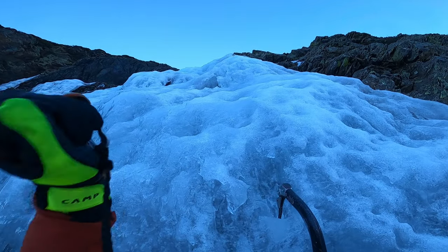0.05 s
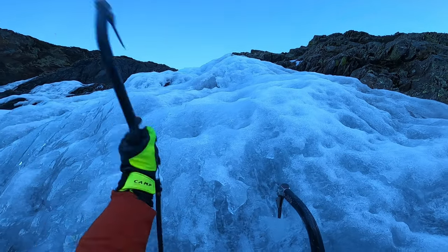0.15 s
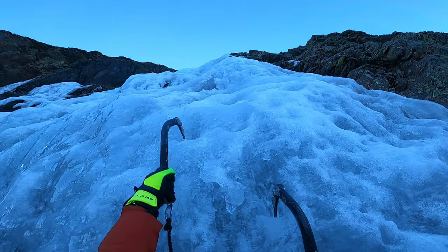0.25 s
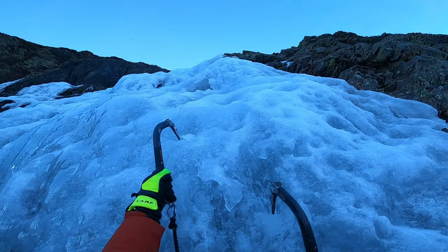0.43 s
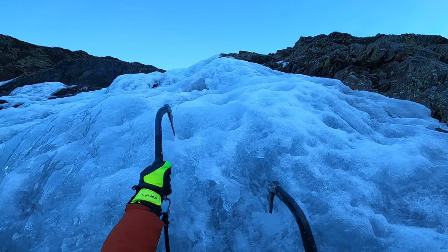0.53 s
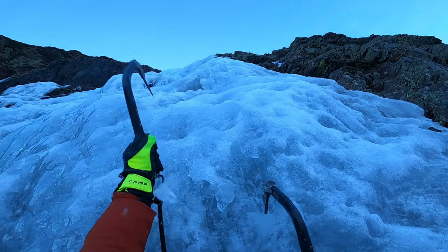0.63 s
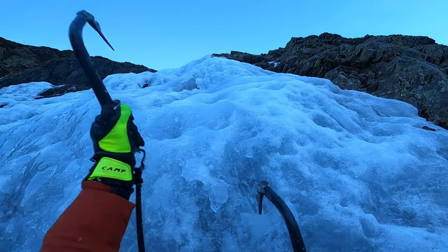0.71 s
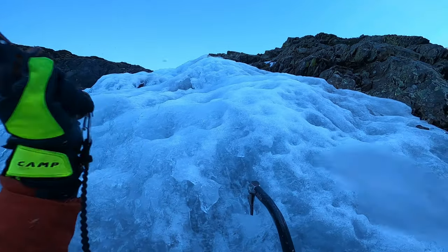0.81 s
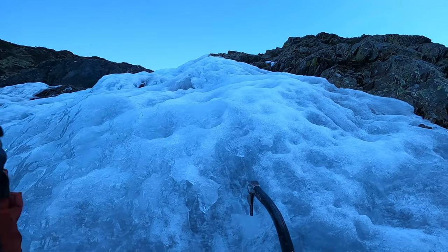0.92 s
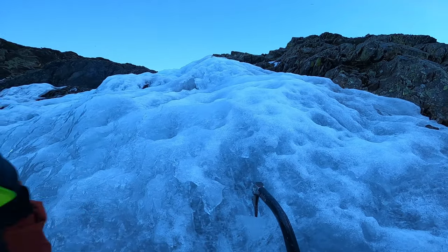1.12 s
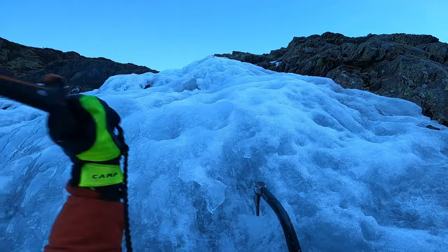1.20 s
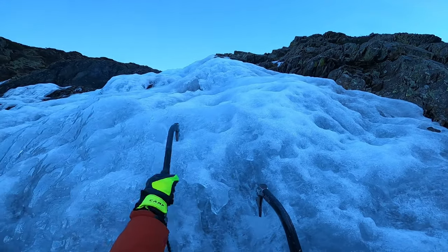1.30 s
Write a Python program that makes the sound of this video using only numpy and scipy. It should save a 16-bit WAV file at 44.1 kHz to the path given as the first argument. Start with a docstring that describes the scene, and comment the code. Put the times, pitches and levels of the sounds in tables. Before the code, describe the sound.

Close up on a mountainside, an ice axe strikes hard ice, knocks as it is levered, then pulls out with a crunch. One flying chip smacks the microphone and small fragments scatter, while a sleeve rustles and wind rumbles softly.

```python
"""An ice axe bites into a frozen slope, shifts with hollow knocks and is wrenched free with a crunch.
Breaking ice is made of bursts of grainy noise; knocks and clinks are tones that die away fast.
Splinters tick all around. One hits the camera by the right microphone and overloads it, so the
volume dips briefly. A sleeve rustles with the swing, wind rumbles on the microphones and the
mountain hisses far away."""
import sys
import numpy as np
from scipy import signal
from scipy.fft import rfft, irfft, next_fast_len
from scipy.io import wavfile
from scipy.ndimage import uniform_filter1d

SR = 44100
rng = np.random.default_rng(int(sys.argv[2]) if len(sys.argv) > 2 else 0)


def put_to_file(sound):
    """Save the sound as 16-bit audio at rate SR, in the file named by the first command-line argument."""
    columns = np.atleast_2d(sound).T  # one column per channel
    safe = np.clip(columns, -1, 1)
    whole_steps = np.round(safe * 32767)
    wavfile.write(sys.argv[1], SR, whole_steps.astype(np.int16))


N = 59535
TIME = np.arange(N) / SR

# The pick crushes the ice, then the edge of the hole crumbles.
# Each row: delay in seconds, level in dB, rise and fade in seconds. A fade is the time to drop 60 dB.
CRUSH_BURSTS = [(0, -13.3, .0025, .014), (.008, -27, .005, 0.056)]
# The tone of that crush. Each row: frequency in Hz, level in dB.
CRUSH_TONE = [(300, -7), (850, -5.5), (1120, 3.5), (1800, -8.5), (2600, 0.5), (3800, -4.5), (4600, -11),
              (8300, -9.5), (9800, -20), (15000, -37)]
# Axe and ice ring together. Each row: pitch in Hz, level in dB, then delay, rise and fade in seconds.
AXE_RING = [(560, -23, 0.004, 0.003, 0.02), (2650, -19, 0, .002, 0.012), (3780, -17, 0, 0.002, 0.009),
            (7734, -17, 0, 0.0027, 0.014)]

def axe_strike(start=.3427):
    """The pick crushes its way in with a knock that falls in pitch, and sets axe and ice ringing."""
    crush = sum(fracture(start + delay, db, rise, fade, CRUSH_TONE)
                for delay, db, rise, fade in CRUSH_BURSTS)
    bite = from_db(-7.5) * vibration(start, hz=990, rise=.004, fade=.011, bend=.6)
    ring = sum(from_db(db) * vibration(start + delay, hz, rise, fade)
               for hz, db, delay, rise, fade in AXE_RING)
    return crush + bite + ring

# The glassy ring that every break wakes in the ice. Each number is a pitch in Hz.
GLASSY_PITCHES = [1652, 2290, 3726, 4050, 5250, 8200]
ICE_WIDTH, ICE_GRAIN_DB = .29, 2.5  # stereo width; how much the tiny breaks differ in size

def fracture(start, db, rise, fade, tone, tilt_db=0):
    """Ice gives way in a short run of tiny breaks, which make the ice around them ring."""
    shape = envelope(start, rise, fade)
    burst = colour(shape * grains(ICE_WIDTH, ICE_GRAIN_DB), tone, tilt_db)
    ring = from_db(-3) * sum(resonance(burst, hz, fade=.057) for hz in GLASSY_PITCHES)
    return from_db(db) * unit_power(burst + ring) * np.sqrt(np.mean(shape ** 2))

# Ice cracks and splinters land. Each row: start in seconds, level in dB, rise and fade in seconds,
# tilt in dB per octave (higher is brighter).
ICE_CRACKS = [(0.283, -30.5, 0.0045, .034, -3.5), (0.373, -37.5, 0.006, 0.058, -1),
              (0.418, -40, .001, 0.029, -0.5), (.4728, -36, .0005, .012, -4.5),
              (.4968, -26.5, 0.0022, 0.042, -3), (0.5243, -31, 0.00066, 0.0052, 1.5),
              (0.5405, -39.5, 0.0075, 0.031, 0), (0.5865, -38.5, 0.00061, 0.011, 1.5),
              (0.705, -40, 0.00033, 0.018, -4), (0.798, -45, 0.0032, .016, 1), (.8135, -37, .0015, .005, 9),
              (.8145, -31.5, .002, .035, -7), (0.893, -23, 0.0027, 0.017, 1),
              (0.8975, -24, 0.00028, 0.007, .5), (0.9023, -23, 0.0036, 0.031, -2.5),
              (0.9459, -34, 0.0027, .02, 1.5), (1.1233, -26, 0.0005, 0.007, 4.8),
              (1.1752, -32.5, 0.0013, 0.02, -1.5), (1.2763, -33.5, 0.0021, 0.024, 1.3),
              (1.3119, -40, .001, 0.017, 0.5)]
# The tone of cracking ice. Each row: frequency in Hz, level in dB.
CRACK_TONE = [(200, -11), (700, -5), (1180, 2), (2700, -.5), (5400, -6), (6400, -10), (8300, -8),
              (10000, -26.5), (15000, -40)]

def cracks():
    """Ice crunches at the pick, and loose splinters tick as they land."""
    return sum(fracture(start, db, rise, fade, CRACK_TONE, tilt)
               for start, db, rise, fade, tilt in ICE_CRACKS)

# Hollow knocks. Each row: start in seconds, level in dB, pitch in Hz, fade in seconds.
PLATE_KNOCKS = [(.379, -37, 215, .07), (0.4724, -32.5, 404, 0.022), (.4968, -18.5, 563, 0.029),
                (0.8141, -27.5, 410, .025), (.8935, -25, 1210, .018), (.9047, -25, 970, .022)]
# The tones in one knock. Each row: pitch multiplier, added level in dB, fade multiplier.
PLATE_TONES = [(.38, -10.5, 0.95), (.72, -7, 0.42), (1, 1, 0.61), (1.1, -1, 1.2)]

def knocks(rise=.0027):
    """The levered pick knocks a plate of ice; neighbouring tones swing in opposite directions."""
    return sum((-1) ** k * from_db(db + added_db) * vibration(start, hz * ratio, rise, fade * stretch)
               for start, db, hz, fade in PLATE_KNOCKS
               for k, (ratio, added_db, stretch) in enumerate(PLATE_TONES))

# Deep thuds. Each row: start in seconds, level in dB, fade in seconds.
SHEET_THUDS = [(.3455, -22, .09), (.8163, -37, .05), (.9055, -25, .03)]

def thuds():
    """The ice sheet flexes under the pick; its lowest tones arrive last, so the pitch drops."""
    return sum(from_db(db) * vibration(start, hz=38, rise=.003, fade=fade, bend=7)
               for start, db, fade in SHEET_THUDS)

# Small clinks. Each row: start in seconds, lower pitch in Hz, levels of the lower and the upper tone
# in dB, fade in seconds.
PICK_CLINKS = [(.746, 4480, -50, -58, .07), (.815, 4900, -50, -62, .1), (.8955, 5390, -25, -32, .019),
               (1.0735, 5100, -44, -41, .022)]

def clinks(upper_ratio=1.5, rise=.002):
    """Pick and chips clink, each time ringing with two bright tones."""
    return sum(from_db(db) * vibration(start, hz * ratio, rise, fade)
               for start, hz, low_db, high_db, fade in PICK_CLINKS
               for ratio, db in ((1, low_db), (upper_ratio, high_db)))

# A faint tick and thump, then the loud hit on the camera and a softer one.
# Each row: start in seconds, tick level in dB, thump level in dB.
TICKS_AND_THUMPS = [(.956, -27, -34.5), (0.9669, -1, -3), (0.976, -15, -14.5)]
# The tones of a tick and a thump. Each row: pitch in Hz, added level in dB, rise and fade in seconds.
TICK_TONES = [(1003, -2, 0.00069, 0.0094), (3760, -6, 0.00031, 0.0094), (5700, 6, 0.00018, 0.0035),
              (12440, -10, 0.00066, 0.0032)]
THUMP_TONES = [(218, 5.5, 0.0018, 0.027), (345, 4, 0.0011, 0.026), (95.4, -14.5, 0.0054, 0.16)]

def camera_hit(thump_delay=.0014):
    """Sharp ticks with dull thumps, mostly on the right; the loudest is a chip hitting the camera."""
    sound = np.zeros(N)
    for when, tick_db, thump_db in TICKS_AND_THUMPS:
        tick, thump = (when, tick_db, TICK_TONES), (when + thump_delay, thump_db, THUMP_TONES)
        for start, db, tones in (tick, thump):
            for hz, added_db, rise, fade in tones:
                sound += from_db(db + added_db) * vibration(start, hz, rise, fade)
    return pan(left_db=-19.5) * sound

# The tone of a hard chip landing. Each row: frequency in Hz, level in dB.
SNAP_TONE = [(900, -20), (1900, 1), (4400, 1), (8500, -12), (11000, -24), (15000, -35)]

def chip_snap(start=1.0246):
    """A hard chip lands close by with one sharp, dry click and a brief rattle."""
    click = from_db(-4.5) * (np.arange(N) == int(start * SR))
    rattle = from_db(-22.5) * envelope(start, rise=0, fade=.013) * grains(ICE_WIDTH, ICE_GRAIN_DB)
    return colour(click + rattle, SNAP_TONE)

def shards(per_second=55, low_hz=1470, high_hz=7140):
    """Loose crumbs of ice land at random down the slope, each with a dry tick of its own pitch."""
    ticks = np.zeros((2, N))
    for when, pitch, size, side in rng.random((int(per_second * N / SR), 4)):
        hz = low_hz * (high_hz / low_hz) ** pitch
        db = -47 - 3 * np.log(max(size, .05))  # many faint ticks, a few louder ones
        tick = vibration(when * N / SR, hz, rise=.00028, fade=.003)
        ticks += pan(left_db=4 * side - 2) * from_db(db) * tick
    return ticks

# How loudly sleeve and glove rub. Each row: time in seconds, level in dB.
RUB_LEVELS = [(0, -67.5), (.12, -51), (.225, -41.5), (.35, -42), (.405, -59.5), (.44, -44.5), (.57, -58.5),
              (.61, -51.5), (.72, -65.5), (.78, -55), (.86, -54), (.93, -44.5), (1.05, -56.5),
              (1.15, -46.5), (1.24, -61), (1.32, -52.5)]
# The tones of the rubbing and of the arm's swish. Each row: frequency in Hz, level in dB.
RUB_TONE = [(400, -5.5), (1400, 2), (5000, -8), (8300, -12), (10500, -24.5), (15000, -30.5)]
SWISH_TONE = [(100, -2.5), (250, -1.5), (900, -16.5), (2500, -44)]

def sleeve():
    """Stiff cloth rubs with a grainy flutter, and the swinging arm pushes air in a soft swish."""
    cloth = grains(width=.23, spread_db=3)
    flutter = from_db(2.5 * flicker(seconds=.0051))
    rubbing = level_curve(RUB_LEVELS) * unit_power(cloth * flutter)
    swish = from_db(-36.5) * envelope(start=.16, rise=.046, fade=.26) * grains(width=.23)
    return colour(rubbing, RUB_TONE) + colour(swish, SWISH_TONE)

# Gusts of wind. Each row: time in seconds, level in dB.
GUST_LEVELS = [(0, -45), (.15, -51), (.21, -36), (.31, -45), (.37, -40), (.72, -51), (.85, -42.5),
               (1.08, -43.5), (1.28, -62.5), (1.335, -45)]
# The tone of the wind. Each row: frequency in Hz, level in dB.
WIND_TONE = [(10, -13), (25, -2.5), (42, 0), (130, -20), (1000, -61.5)]

def wind():
    """Wind blows on the microphones with a low rumble that swells and sinks."""
    rumble = colour(grains(width=.62), WIND_TONE)
    return level_curve(GUST_LEVELS) * unit_power(rumble)

# The tone of the distant hiss. Each row: frequency in Hz, level in dB.
MOUNTAIN_TONE = [(300, -3.5), (900, -11), (1450, 1), (2100, -13), (4000, -12), (8000, -20.5), (15000, -50)]

def mountain():
    """The mountain hisses faintly and steadily, far away."""
    return from_db(-57) * colour(grains(width=.22), MOUNTAIN_TONE)

def from_db(db):
    """Turn decibels into a volume multiplier."""
    return 10 ** (np.asarray(db) / 20)

def unit_power(x):
    """Scale a signal so that its average power is one."""
    return x / np.sqrt(np.mean(x ** 2) + 1e-20)

def level_curve(rows):
    """A volume that glides between rows of time in seconds and level in dB."""
    return from_db(np.interp(TIME, *np.transpose(rows)))

def pan(left_db):
    """Left and right volumes: positive leans left, and the nearer side stays at one."""
    return from_db([[min(left_db, 0)], [min(-left_db, 0)]])

def envelope(start, rise, fade):
    """A straight rise, then a fall of 60 dB every `fade` seconds."""
    age = TIME - start
    attack = np.clip(age / max(rise, 1e-5), 0, 1)
    return attack * np.exp(-np.log(1000) * np.clip((age - rise) / fade, 0, 10))

def vibration(start, hz, rise, fade, bend=0, settle_s=.006):
    """One dying tone that starts at (1 + bend) times its pitch and settles down to it."""
    age = np.maximum(TIME - start, 0)
    cycles = hz * (age + bend * settle_s * (1 - np.exp(-age / settle_s)))
    return envelope(start, rise, fade) * np.sin(2 * np.pi * cycles)

def resonance(x, hz, fade):
    """Pick one pitch out of a sound and let it ring on."""
    decay = from_db(-60 / (fade * SR))
    feedback = [1, -2 * decay * np.cos(2 * np.pi * hz / SR), decay ** 2]
    return signal.lfilter(np.array([1, 0, -1]) * (1 - decay ** 2) / 2, feedback, x)

def colour(x, tone, tilt_db=0):
    """Filter a sound by a tone table and a tilt per octave; white noise keeps its power."""
    size = 2 * next_fast_len(N // 2 + 4096)
    octaves = np.log2(np.maximum(np.arange(size // 2 + 1) * SR / size, 1))
    hz, db = np.transpose(tone)
    curve_db = np.interp(octaves, np.log2(hz), db) + tilt_db * np.clip(octaves, 9, 14)
    gain = unit_power(from_db(curve_db))
    # Fold the filter forward in time, so nothing rings before the hit that causes it.
    cepstrum = irfft(np.log(gain))
    cepstrum[1:size // 2] *= 2
    cepstrum[size // 2 + 1:] = 0
    return irfft(rfft(x, size) * np.exp(rfft(cepstrum)))[..., :N]

def grains(width, spread_db=0):
    """Stereo white noise; a spread breaks it into tiny clicks of uneven size."""
    mid, side = rng.standard_normal((2, N))
    grain_db = spread_db * np.minimum(rng.exponential(1, N // 16 + 1), 4)
    sizes = from_db(grain_db).repeat(16)[:N]
    return unit_power(sizes * (mid + width * side * np.array([[1], [-1]])))

def flicker(seconds):
    """A random wobble, smoothed over the given time."""
    size = max(int(seconds * SR), 1)
    return unit_power(uniform_filter1d(uniform_filter1d(rng.standard_normal(N), size), size))

def scene():
    """Everything that reaches the two microphones."""
    axe_and_ice = axe_strike() + thuds() + knocks() + cracks() + clinks()
    return axe_and_ice + chip_snap() + camera_hit() + sleeve() + wind() + mountain() + shards()

def record(dry):
    """An overload turns the volume down; it holds, then recovers. Peaks clip and the top treble is cut."""
    overload, ceiling, cutoff_hz = 1.3, .92, 16000
    depth_db, attack_s, hold_s, recovery_db_per_s = 16.5, .0016, .038, 900
    overloaded = np.abs(dry).max(axis=0) > overload
    since_overload = TIME - np.maximum.accumulate(np.where(overloaded, TIME, -1))
    dip_db = np.clip(depth_db - recovery_db_per_s * (since_overload - hold_s), 0, depth_db)
    smoothing = np.exp(-1 / (attack_s * SR))
    dipped = dry * from_db(-signal.lfilter([1 - smoothing], [1, -smoothing], dip_db))
    treble_cut = signal.ellip(10, .1, 90, cutoff_hz, fs=SR, output="sos")
    return signal.sosfilt(treble_cut, np.clip(dipped, -ceiling, ceiling))

dry = scene()
out = record(dry)
put_to_file(out)
```